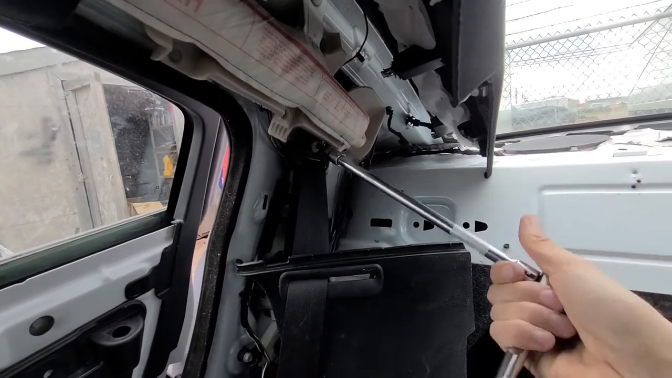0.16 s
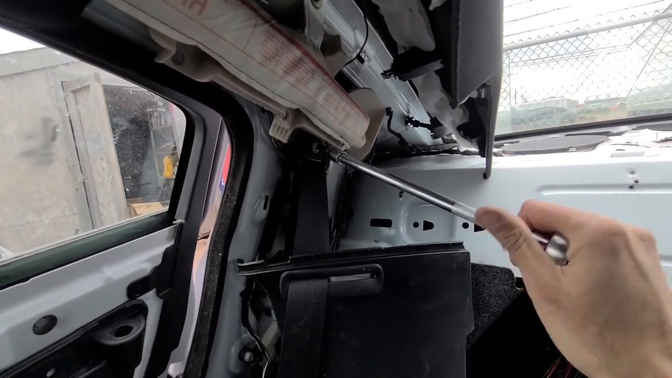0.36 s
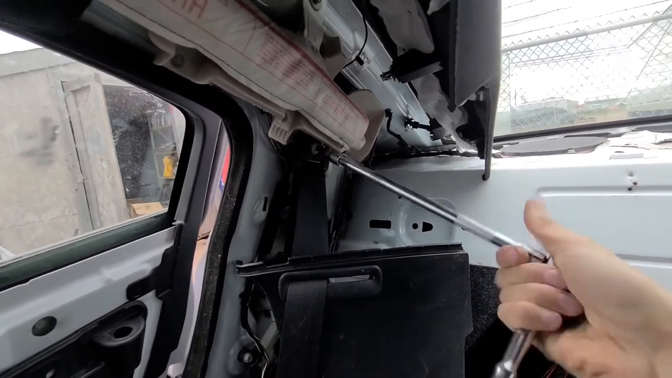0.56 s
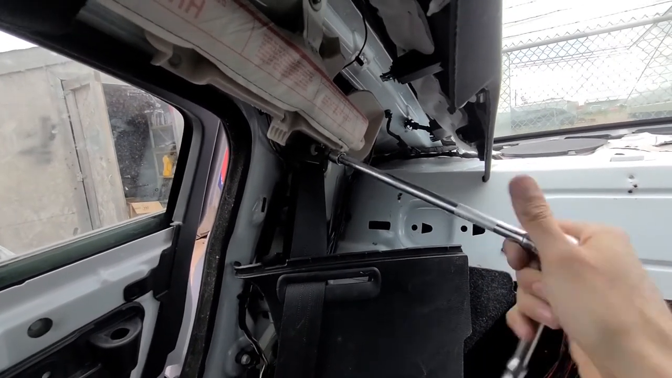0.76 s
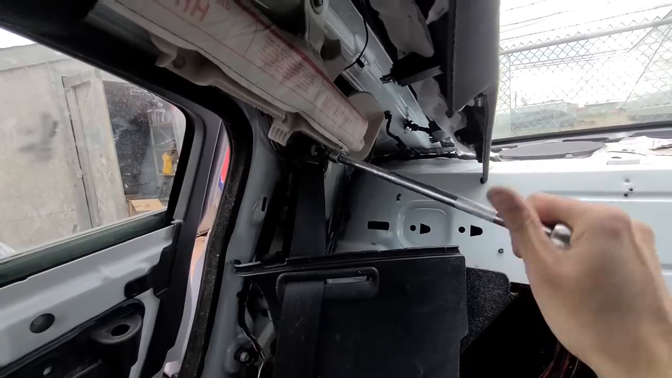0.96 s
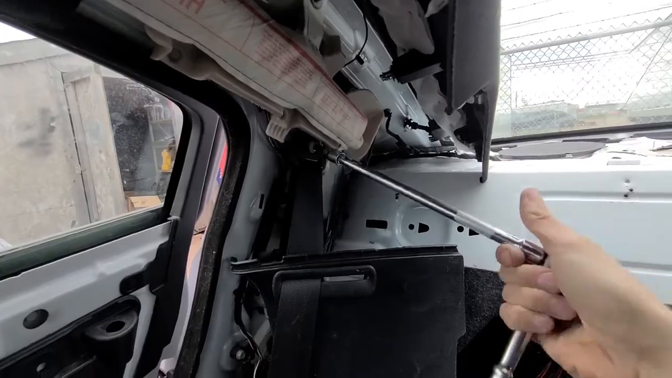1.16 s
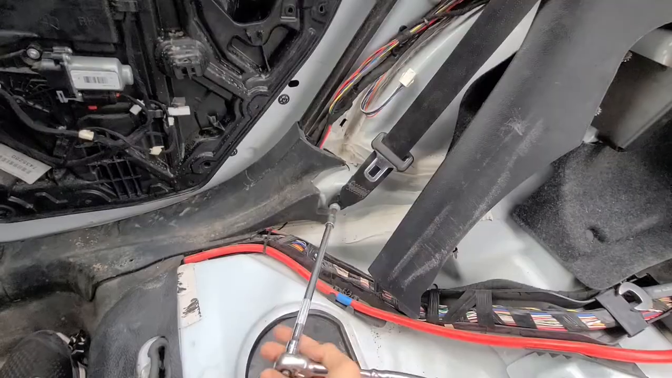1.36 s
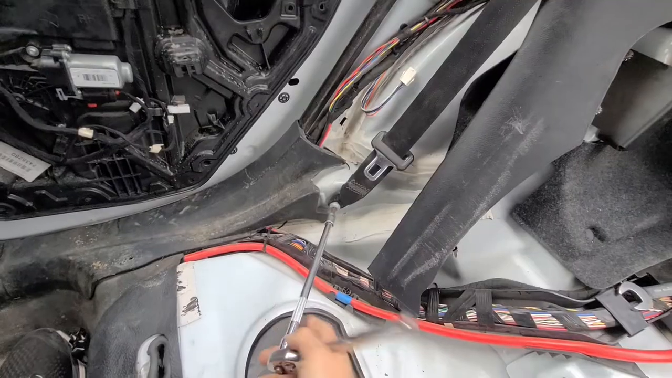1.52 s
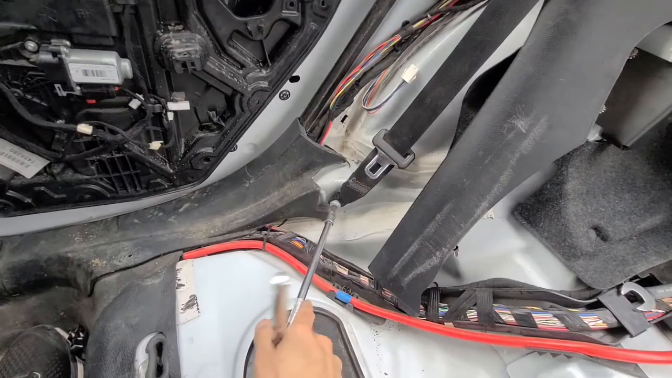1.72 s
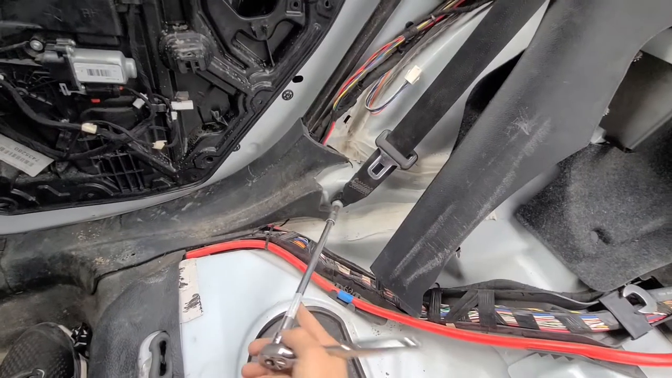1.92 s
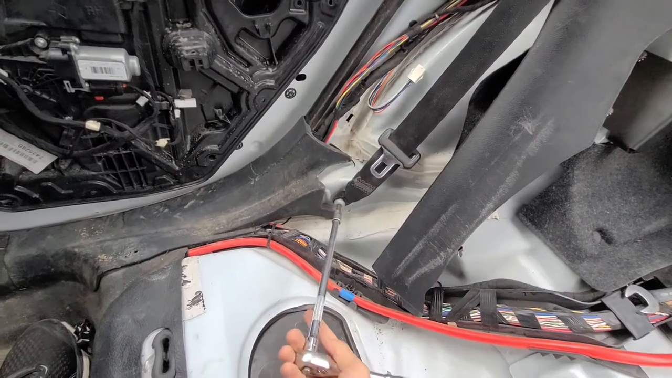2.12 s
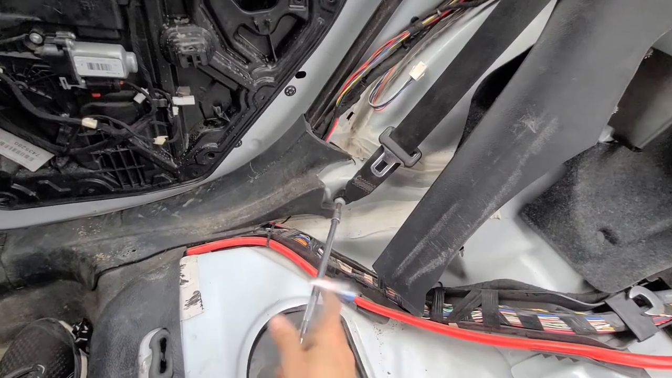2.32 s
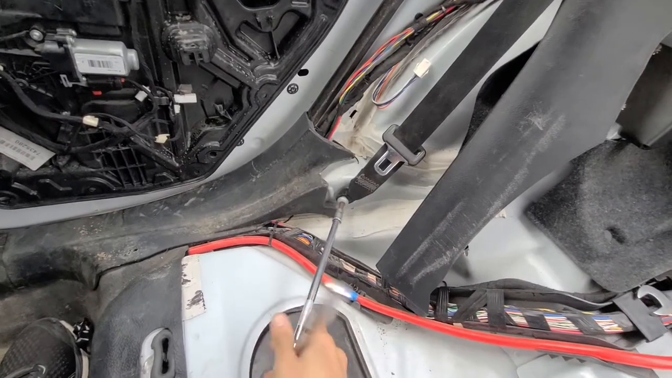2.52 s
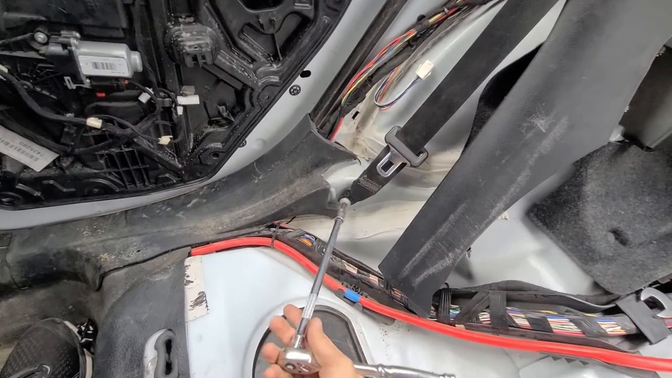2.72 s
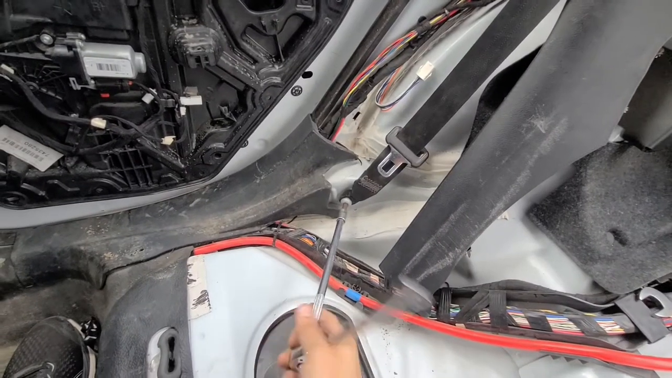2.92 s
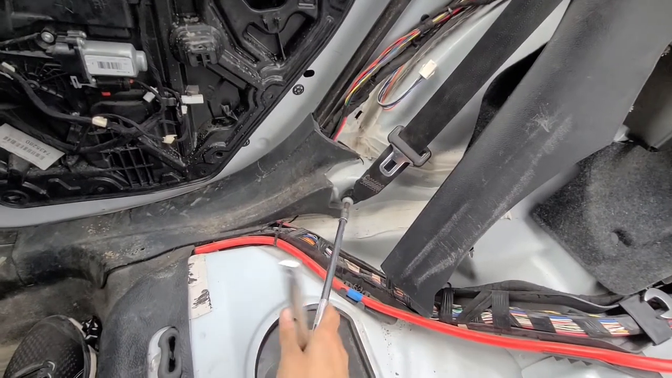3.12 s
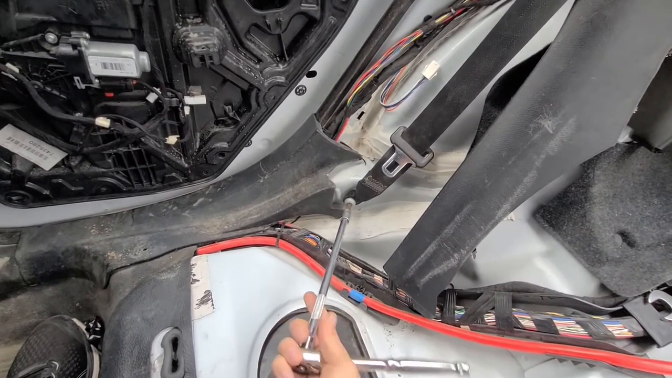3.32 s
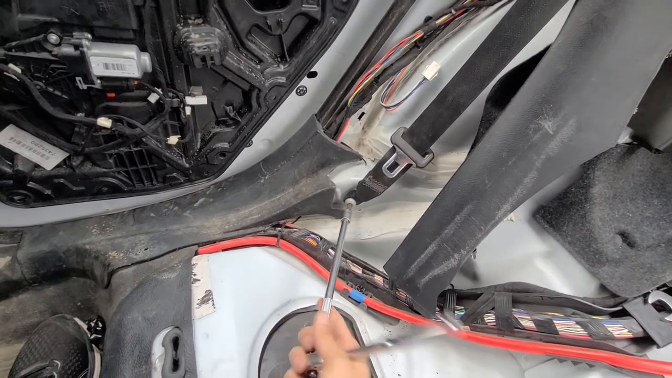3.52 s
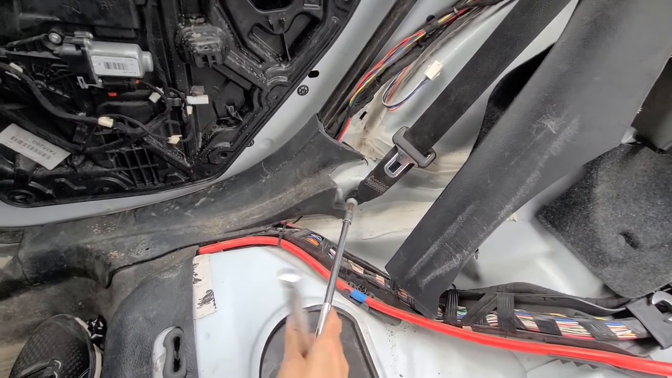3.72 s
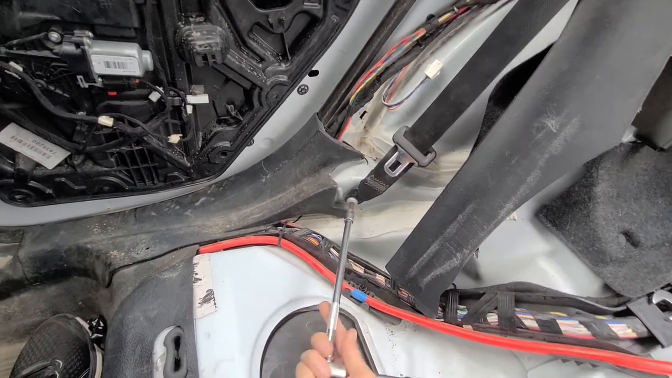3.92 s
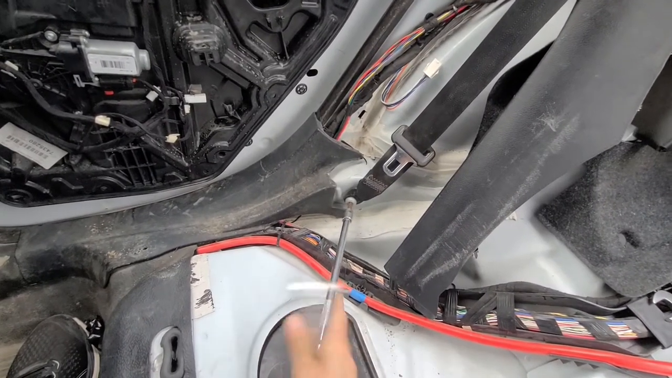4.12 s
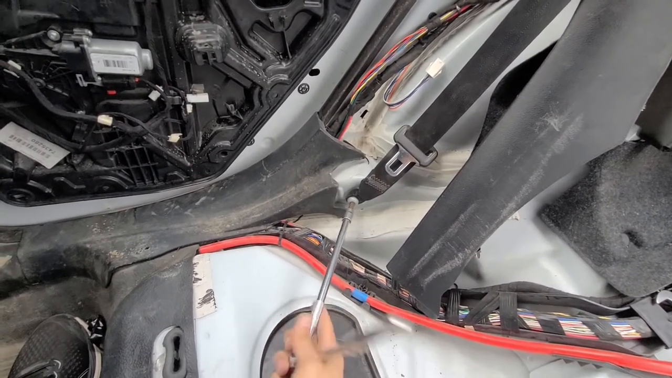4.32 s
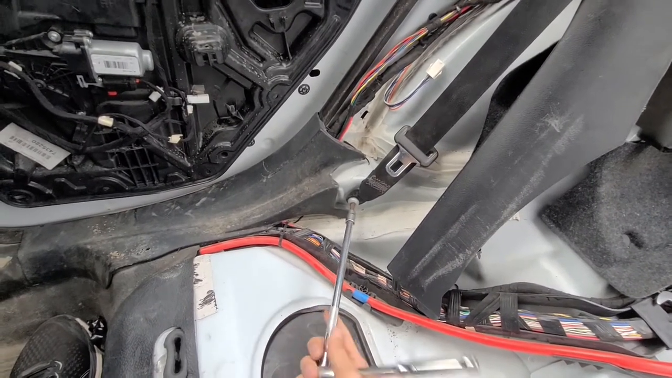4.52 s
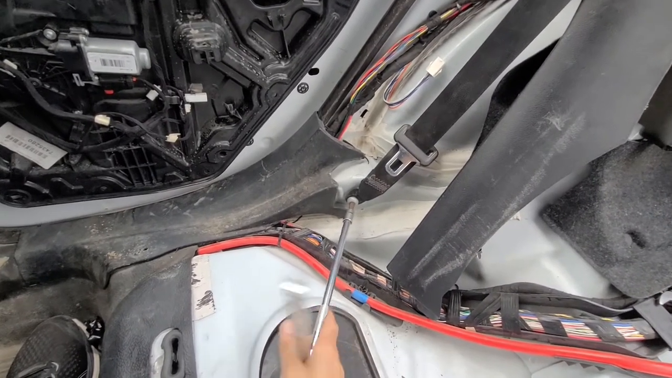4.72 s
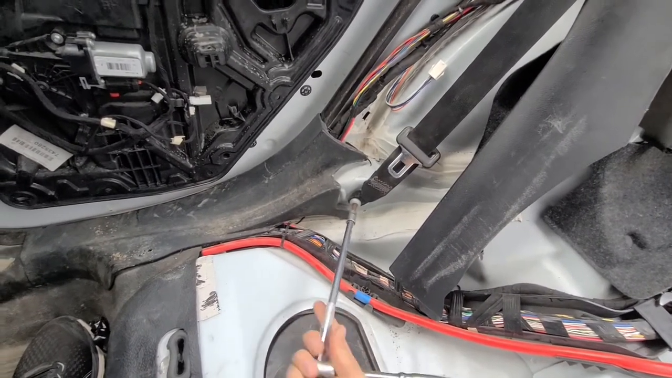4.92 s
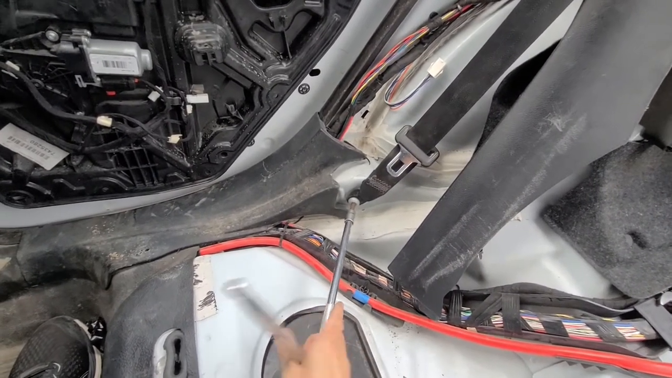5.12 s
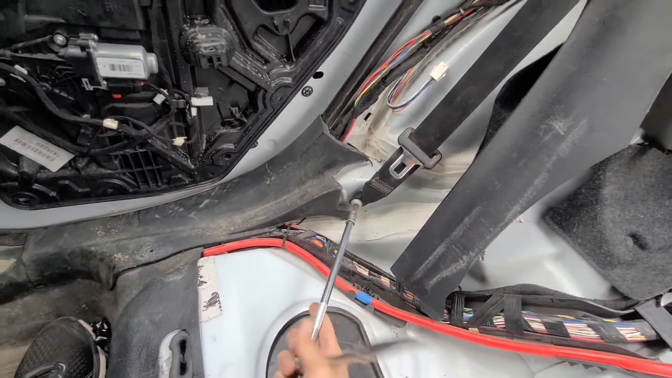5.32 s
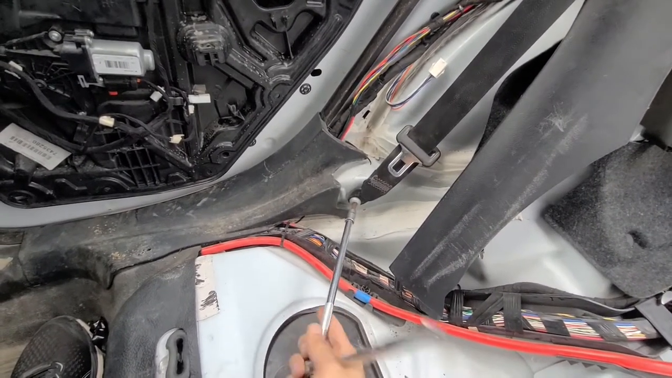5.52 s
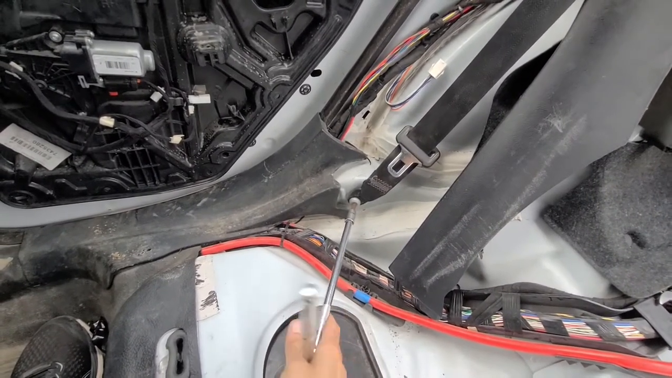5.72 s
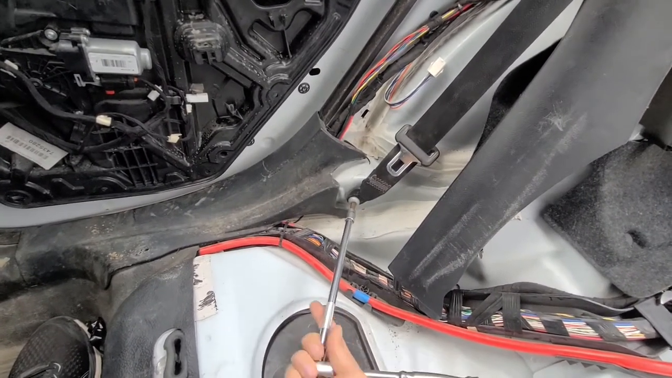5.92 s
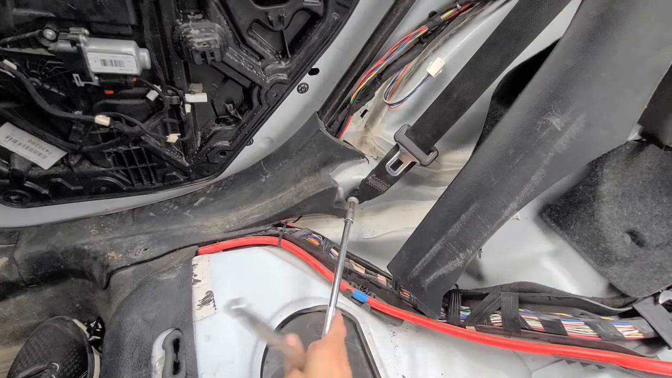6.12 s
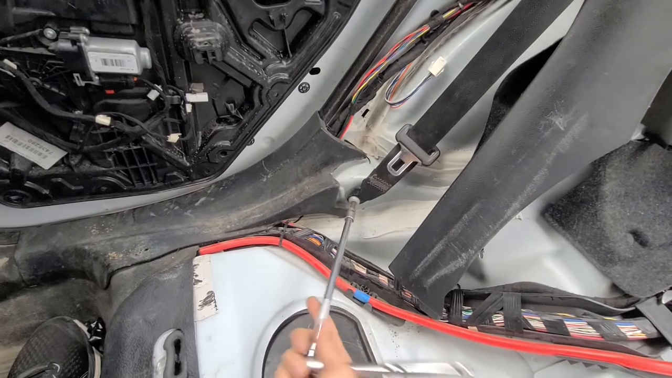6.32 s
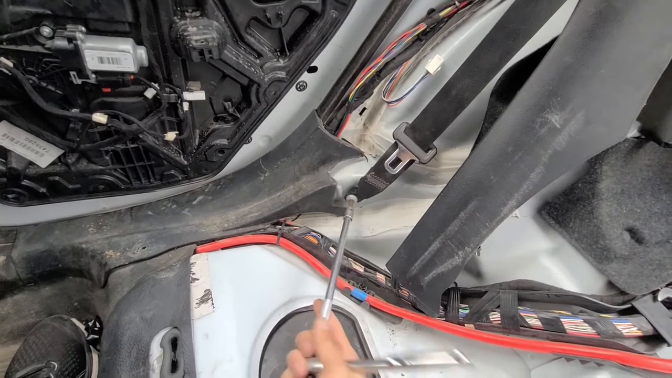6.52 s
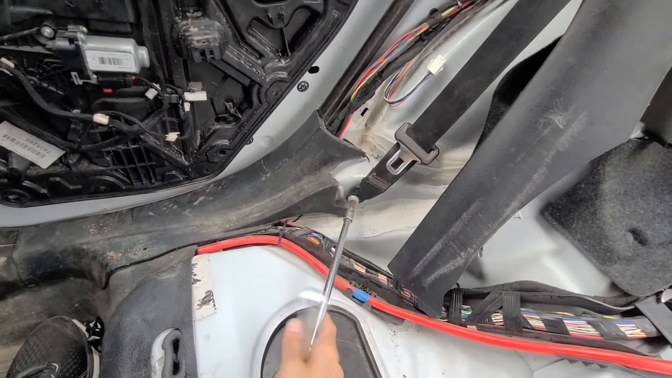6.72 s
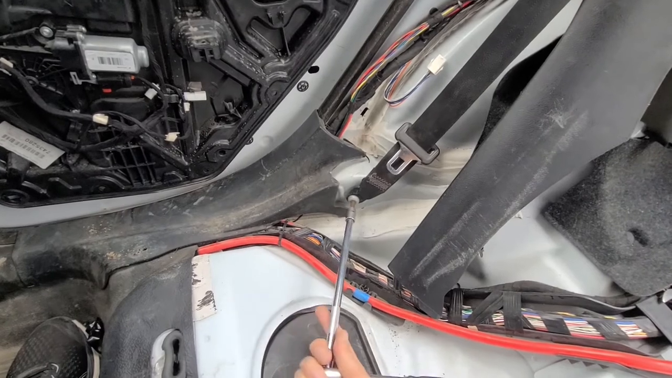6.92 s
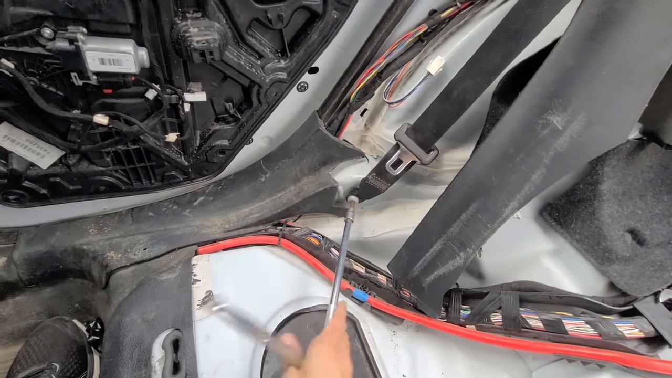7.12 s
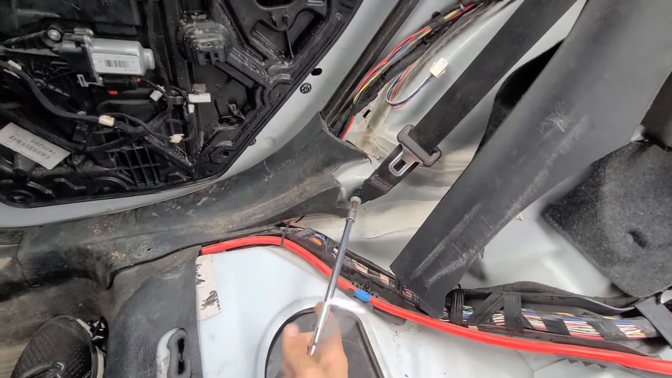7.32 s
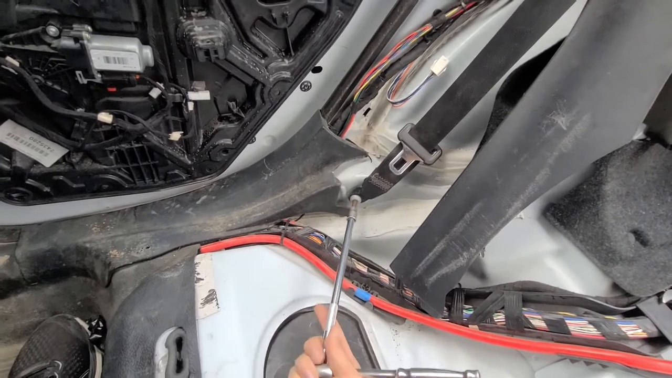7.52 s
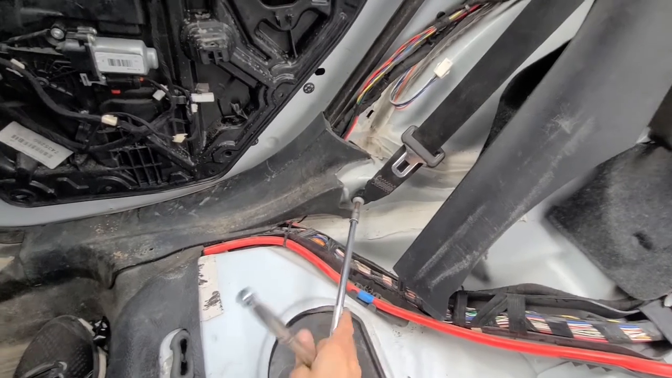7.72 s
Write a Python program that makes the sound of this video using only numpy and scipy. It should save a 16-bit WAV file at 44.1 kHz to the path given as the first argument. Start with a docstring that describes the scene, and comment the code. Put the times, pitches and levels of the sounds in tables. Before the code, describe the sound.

Inside a bare car cabin, close in stereo, a ratchet on a long extension gives two dense runs of steel clicks while a large panel rumbles, knocks and rasps. After a tiny dry tick and a very brief total silence, a cleaner series follows: a dozen short click runs about twice a second, with dull knocks and soft hand rubs between them over quiet outdoor air.

```python
"""Inside a stripped car cabin, a hand ratchet on a long extension tightens two bolts close to a stereo microphone.
On each back swing the pawl clicks over the gear teeth; slack in the joints knocks into the body panels.
Clicks and knocks are short bursts of noise that ring steel, panel and boom resonances, then a tail cut short.
Rumble, rasps, sliding and the quiet outdoor background are coloured noise with levels of their own.
The first bolt sits on a large booming panel; a short silence separates it from the second."""
import sys
import numpy as np
from scipy import signal
from scipy.fft import rfft, irfft
from scipy.io import wavfile
from scipy.ndimage import uniform_filter1d

SR = 44100
rng = np.random.default_rng(int(sys.argv[2]) if len(sys.argv) > 2 else 0)


def volts_from_decibels(level):
    """Turn decibel levels (scalar or array-like) into linear amplitude factors."""
    exponent = np.asarray(level, float) / 20
    return 10 ** exponent


def transcribe(signal):
    """Save signal, clipped to [-1, 1], as a 16-bit WAV file at the path in sys.argv[1]."""
    frames = np.atleast_2d(signal).T
    limited = np.clip(frames, -1, 1)
    pcm = np.round(limited * 32767).astype(np.int16)
    wavfile.write(sys.argv[1], SR, pcm)


N = 346626  # length in samples
SILENCE_FROM_S, SILENCE_TO_S = 1.2405, 1.2945
RING = 8192  # samples that one blow may ring
HZ = np.fft.rfftfreq(RING, 1 / SR)

# resonances of the steel tool, the panels and their boom: pitch_hz, width_hz (before the grip's damping),
# level_db (relative)
STEEL = [(1950, 610, -5.5), (2778, 134, 7.5), (3470, 118, 5), (4133, 180, 8), (6700, 600, -6),
         (6400, 59, -55), (7430, 1100, -9.5), (11000, 140, -45), (12400, 1040, -27), (14650, 2200, -20)]
PANEL = [(464.5, 18.3, 0.5), (525.6, 14.7, -2), (662.7, 15.4, 2), (837.6, 16, 5.5), (1084, 20, -7.5),
         (1216, 47, 2.5), (1445, 77, -7), (1873, 48.4, 1.5), (2130, 130, -8.5)]
BOOM = [(71, 28, -15.5), (90.6, 26.6, -2.5), (121, 49.5, -2), (200.7, 47, -3.5), (223.1, 6.9, 3),
        (278.7, 17, 3), (362.6, 41, -8.5)]
# the many blurred resonances between them: pitch_hz, level_db (relative)
STEEL_BED = [(500, -26.5), (1500, -9.5), (3000, -4.5), (6000, -2.5), (9000, -11), (12000, -2.5),
             (14000, -5.5), (16500, -29.5)]
PANEL_BED = [(200, -41.5), (500, -8), (1200, -19), (2500, -28.5), (5000, -29), (12000, -67.5)]
# how alike left and right are: pitch_hz, likeness (0 to 1)
SAME = [(60, 0.98), (160, 0.98), (290, 0.93), (640, 0.82), (1400, 0.29), (3000, 0.22), (15000, 0.15)]
# back swings: first_click_s, last_click_s, teeth (count), first_angle and last_angle (share of the half arc, -1 to 1)
SWINGS = [(.2341, .3736, 13, -.5, .75), (.7122, .8615, 13, -.6, .88), (1.471, 1.5678, 6, -.817, .809),
          (2.1977, 2.3344, 10, -.86, .949), (2.8513, 3.0028, 10, -.817, .953),
          (3.4775, 3.6049, 9, -.835, .955), (4.0056, 4.1377, 11, -.93, .823),
          (4.5131, 4.6403, 9, -.735, .984), (4.9947, 5.0895, 9, -.78, .79), (5.501, 5.5811, 7, -.493, .934),
          (5.9885, 6.0966, 9, -.635, .939), (6.4899, 6.5928, 9, -.832, .77),
          (6.9996, 7.1042, 10, -.719, .969), (7.6002, 7.6869, 7, 0, .956)]
# loudness of each swing: first_click_db, last_click_db, socket_drag_db
SNAPS = [(-24.5, -35, -40.5), (-19, -34, -35.5), (-17.5, -27.5, -36), (-18.5, -30.5, -30.5),
         (-16.5, -24.5, -37.5), (-18.5, -22, -43), (-19, -19.5, -36.5), (-15, -25.5, -35.5),
         (-16.5, -19.5, -37.5), (-15, -22.5, -46), (-17.5, -22, -37), (-14.5, -20.5, -38), (-15, -23, -35),
         (-15.5, -23, -45)]


def evened(x):
    """Scale a signal to an rms of 1."""
    return x / np.sqrt(np.mean(abs(x) ** 2) + 1e-20)


def read(points, hz):
    """Read a table between its points, along log frequency."""
    f, value = np.transpose(points)
    return np.interp(np.log(hz + 1), np.log(f + 1), value)


def pair(left, other, hz):
    """Spectra at two microphone ports: alike in the bass, unlike and leaning left in the treble."""
    # pitch_hz, left_over_right_db
    lean_points = [(60, 1.5), (400, 2), (700, 1), (1300, 3.5), (4400, 3), (8000, 0.5), (15000, 2)]
    same = np.clip(read(SAME, hz), 0, 1)
    lean = volts_from_decibels(read(lean_points, hz) / 2)
    right = same * left + np.sqrt(1 - same ** 2) * other
    return np.array([left * lean, right / lean])


def causal(points):
    """Response with the given spectrum that starts as promptly as possible (minimum phase)."""
    log_gain = np.log(volts_from_decibels(read(points, HZ)))
    circle = np.r_[log_gain, log_gain[-2:0:-1]]
    return np.exp(log_gain - 1j * signal.hilbert(circle).imag[:len(HZ)])


def modes(table):
    """One resonance response a row: a narrower one rings longer."""
    hz, width, db = np.transpose(table)[:, :, None]
    return volts_from_decibels(db) * 1j * HZ * width / (hz ** 2 - HZ ** 2 + 1j * HZ * width)


def noise(colour, level, patchy_db, size):
    """Coloured noise from random short-time spectra with louder and softer patches, then scaled by level."""
    frames, hz = 4 * N // size + 5, np.fft.rfftfreq(size, 1 / SR)
    a, b, c, d, patches = rng.standard_normal((5, frames, len(hz)))
    patches = uniform_filter1d(patches, size=6, axis=0)
    patches = evened(uniform_filter1d(patches, size=10, axis=1))
    spectra = pair(a + 1j * b, c + 1j * d, hz) * colour(hz) * volts_from_decibels(patchy_db * patches)
    sound = signal.istft(spectra.transpose(0, 2, 1), nperseg=size, noverlap=3 * size // 4)[1]
    return level * evened(sound[:, :N])


def curve(rows):
    """Gain over time from rows of time and dB, silent outside the table."""
    time_s, db = np.transpose(rows)
    return volts_from_decibels(np.interp(np.arange(N) / SR, time_s, db, -200, -200))


def swells(rows):
    """Sum of bell-shaped gains from rows of middle (s), half length (s) and dB."""
    t = np.arange(N) / SR
    return sum(volts_from_decibels(db) * np.exp(-((t - s) / half) ** 2) for s, half, db in rows)


def cabins(count, wet_db):
    """Direct sound, a little later on the left, and a short dense tail, in a few random variants."""
    # early fall of the tail: pitch_hz, time_to_lose_60_db (s)
    cabin_fall = [(100, .24), (300, .15), (1000, .12), (2800, .1), (8000, .1), (16000, .09)]
    # tails are cut short as if by a noise gate: pitch_hz, time_to_lose_a_further_30_db (s)
    gate_fall = [(100, .2), (1000, .075), (2500, .046), (16000, .04)]
    taps = np.zeros((count, 2, RING))
    at = np.arange(40, RING - 40, 20) + rng.integers(0, 20, (count, 2, (RING - 61) // 20))
    np.put_along_axis(taps, at, rng.choice([-1., 1.], at.shape), 2)
    hz, t, z = signal.stft(taps, SR, nperseg=128)
    fall_db = 60 * t / read(cabin_fall, hz)[:, None]
    fall_db = fall_db + 30 * (t / read(gate_fall, hz)[:, None]) ** 3
    room = signal.istft(z * volts_from_decibels(-fall_db), SR, nperseg=128)[1][..., :RING]
    room *= volts_from_decibels(wet_db) / np.linalg.norm(room, axis=2, keepdims=True)
    # direct sound; the left delay in samples differs from variant to variant
    room[:, 1, 0] += 1
    room[np.arange(count), 0, 2 + 2 * np.arange(count)] += 1
    z = rfft(room)
    return pair(z[:, 0], z[:, 1], HZ).transpose(1, 0, 2)


def blows(times, contact_ms, rise, wet_db, bright_db, bodies):
    """Each blow is a brief chatter of contacts that rings every body unevenly, then the cabin.

    rise: time constant of the onset as a share of the contact; bright_db: treble tilt per octave.
    bodies: (modes, bed, random shift of the modes as a share, ms over which the level holds, dB of each blow).
    """
    # resonances of the panel under the first bolt: pitch_hz, width_hz (before the grip's damping), level_db (relative)
    first_panel = [(458, 37, 12), (537, 14, 9.5), (735, 90, 2), (1126, 22, 5), (1448, 30, -1),
                   (3420, 130, -7)]
    grip_damping = 1.48  # the hand and the seated socket widen every mode
    grit_db, grit_ms = 4.5, 0.7  # a contact is a lumpy string of tiny impacts; full grit from 12 ms up
    rooms = cabins(count=5, wet_db=wet_db)  # used in turn by successive blows
    mix, t = np.zeros((2, N + RING)), np.arange(2048) / SR * 1000  # t in ms
    octaves = np.log2(np.clip(HZ, 2000, 16000) / 5000)
    alike = np.clip(read(SAME, HZ), .7, 1)  # the tool radiates a little differently towards each port
    for k, (s, ms) in enumerate(zip(times, np.clip(contact_ms, .3, 30))):
        shape = (1 - np.exp(-t / (rise * ms))) * np.exp(-(t / ms) ** 2)
        lumps = evened(uniform_filter1d(rng.standard_normal(len(t)), int(grit_ms * SR / 1000)))
        shape *= volts_from_decibels(grit_db * np.clip(ms / 12, 0, 1) * lumps)
        chatter = rfft(shape * rng.standard_normal((2, len(t))), RING)
        chatter[1] = alike * chatter[0] + np.sqrt(1 - alike ** 2) * chatter[1]
        heard = chatter * rooms[k % len(rooms)] * volts_from_decibels(bright_db[k] * octaves)
        for table, bed, shift, hold_ms, db in bodies:
            table = first_panel if table is PANEL and s < SILENCE_FROM_S else table
            chance = rng.standard_normal((2, 10))[:, :len(table)]
            struck = volts_from_decibels(2 * chance[0]) * (-1) ** np.arange(len(table))
            # each pitch shifts a little at random; the grip widens each mode
            change = np.c_[1 + shift * chance[1], np.ones((len(table), 2)) * [grip_damping, 1]]
            ring = modes(np.array(table) * change)
            sound = irfft(heard * (struck @ ring + bed))
            power = uniform_filter1d((sound ** 2).mean(0), int(hold_ms * SR / 1000))
            mix[:, round(s * SR):][:, :RING] += volts_from_decibels(db[k]) * sound / np.sqrt(power.max())
    return mix[:, :N]


def air():
    """Quiet outdoor background reaching into the cabin: steady noise, with less treble at the first bolt."""
    # colour of the background: pitch_hz, level_db (relative)
    air_colour = [(15, -22), (25, -66), (80, 19), (285, -4.5), (516, -1), (818, 1), (962, -27.5),
                  (1260, 5.5), (1610, -51), (1890, -13), (2480, -29.5), (3520, -12.5), (9070, -30.5),
                  (11900, -20.5), (16000, -26)]
    wash = noise(lambda hz: volts_from_decibels(read(air_colour, hz)), volts_from_decibels(-56), 0.5, size=2048)
    duller = signal.lfilter([.15], [1, -.85], wash)
    first_air = duller + volts_from_decibels(-25) * (wash - duller)
    return np.where(np.arange(N) < SILENCE_FROM_S * SR, first_air, wash)


def rasp_level():
    """Each rasp rises quickly, changes level while it holds, then dies away."""
    # loose parts rasp while the handle moves: start_s, hold_s, level_db, lost_over_hold_db
    rasps = [(0, .04, -36, 12.5), (.195, .03, -39, 7), (0.235, 0.11, -21, -0.5), (0.429, 0.087, -36.5, 1.5),
             (0.718, .14, -20.5, 4.5), (0.974, 0.091, -45.5, 5)]
    rise_s, fall_db_per_s = 0.0062, 709
    t = np.arange(N) / SR - np.array(rasps)[:, :1]
    hold, db, sag_db = np.transpose(rasps)[1:, :, None]
    fall_db = sag_db * np.clip(t / hold, 0, 1) + fall_db_per_s * np.maximum(t - hold, 0)
    return (np.clip(t / rise_s, 0, 1) * volts_from_decibels(db - fall_db)).sum(0)


def shake():
    """The first panel rumbles as noise shaped by its low modes, while loose parts rasp along."""
    # the large panel rumbles with the effort on the handle: time_s, level_db
    effort = [(0, -32.5), (.1, -37), (.18, -44.5), (.25, -31), (.37, -34.5), (.43, -34), (.55, -28.5),
              (.62, -40.5), (.7, -36.5), (.85, -48), (.92, -32.5), (1.05, -39), (1.11, -57.5),
              (1.24, -50.5)]
    # colour of the rasps: (pitch Hz, relative dB)
    loose = [(300, 14), (700, 9.5), (1500, 4.0), (2400, -5.5), (3100, 8.0), (4500, -27), (7000, -11.5),
             (12000, -12), (16000, -28)]
    boom = np.sqrt((abs(modes(BOOM)) ** 2).sum(0))
    rumble = noise(lambda hz: np.interp(hz, HZ, boom), curve(effort), 3, size=2048)
    rasp = noise(lambda hz: volts_from_decibels(read(loose, hz)), rasp_level(), 2, size=256)
    return rumble + rasp


def slack():
    """Knocks as slack is taken up, mostly duller and longer than the clicks, plus a few short steel clicks."""
    # knocks and a few clicks: bite_s, steel_db, panel_db, boom_db, contact_ms (blows() limits it to 0.3 to 30)
    knocks = [(0.013, -41, -19, -15, 5.7), (0.104, -39, -23, -20, 6), (.192, -35, -25, -25.5, 8),
              (0.213, -50, -22, -48, 32), (0.332, -21.5, -26, -39, 2), (.3732, -31.5, -44, -43.5, 2.3),
              (0.434, -31, -28, -37, 19), (0.451, -39.5, -25.5, -25, 8), (0.554, -36.5, -27, -28.5, 8.9),
              (.608, -36, -20.5, -22, 6.7), (0.64, -45, -44, -39, 2.6), (.669, -53, -44, -34.5, 3.5),
              (0.699, -51, -27.5, -53, 3.8), (0.912, -49, -31.5, -37, 3.9),
              (.935, -26.5, -21.5, -28.5, 13.4), (0.954, -54.5, -36.5, -44, 1),
              (1.007, -43, -25.5, -24, 3.5), (1.036, -58, -53, -35.5, 8.2),
              (1.372, -51.5, -33.5, -40.5, 11), (1.387, -37, -33, -43.5, 14), (1.685, -51, -47, -53, 5.6),
              (1.723, -37.5, -32, -46, 17), (1.739, -36, -32, -43.5, 8), (2.129, -49, -60, -42.5, 6.5),
              (2.404, -44.5, -36.5, -35.5, 14.5), (2.437, -36, -21.5, -23.5, 19),
              (2.467, -31, -35, -28, 7.5), (2.482, -37.5, -28, -34.5, 11), (2.778, -52.5, -26, -27.5, 5.8),
              (2.798, -38, -26.5, -54, 11.5), (3.05, -43, -26, -36.5, 20), (3.069, -24, -22.5, -27.5, 5.2),
              (3.245, -17.5, -17, -29.5, 3.25), (3.414, -43, -27.5, -27.5, 6.2),
              (3.428, -31.5, -29, -53, 9.7), (3.662, -51, -37, -45, 15), (3.684, -38.5, -26, -35, 9.9),
              (3.72, -40, -47, -59, 4.5), (3.76, -57, -41.5, -50, 11.4), (3.828, -51, -55, -65, 5),
              (3.927, -48.5, -32, -45, 15), (3.949, -40, -33.5, -41, 2.7), (4.178, -37, -46, -44, 3),
              (4.203, -30, -31.5, -38.5, 12), (4.213, -24.5, -19, -26.5, 9.5), (4.448, -52.5, -35, -37, 16),
              (4.417, -61.5, -45, -48, 5.4), (4.473, -32.5, -49.5, -65, 2.5), (4.676, -26.5, -25, -41, 18),
              (4.695, -27, -19.5, -25, 8), (4.85, -46.5, -55, -68, 7.3), (4.892, -63, -47, -43, 11),
              (4.93, -53, -31.5, -35.5, 6.9), (4.953, -31, -40, -51, 4.9), (5.1264, -19.5, -55, -46, 3.2),
              (5.158, -24, -16, -28.5, 14.3), (5.322, -49, -53.5, -68, 4.2),
              (5.451, -49.5, -30, -41.5, 6.4), (5.469, -29.5, -31, -51, 7), (5.637, -53, -33, -43, 40),
              (5.667, -37, -31, -39, 17), (5.788, -47, -42.5, -50, 16.6), (5.922, -37, -23, -29, 5.9),
              (5.957, -30, -36, -39, 8), (6.136, -39.5, -40, -38, 6.9), (6.151, -25, -32.5, -40, 4),
              (6.161, -25, -19.5, -40, 13), (6.173, -21.5, -17.5, -31.5, 6.2),
              (6.437, -31.5, -31, -36, 3.3), (6.451, -26.5, -29.5, -44, 6), (6.644, -44, -26, -45, 22),
              (6.678, -35.5, -31, -34, 11), (6.694, -30.5, -21.5, -30, 6.2), (6.758, -55, -54, -52, 3.9),
              (6.804, -50, -33.5, -44.5, 7.8), (6.957, -40, -26, -33.5, 11), (6.975, -25.5, -24, -33, 5.2),
              (7.144, -28.5, -30.5, -46, 22), (7.171, -17.5, -11, -24, 7.5), (7.292, -49, -49, -52.5, 7.3),
              (7.319, -41.5, -43.5, -58, 7.3), (7.563, -37, -30.5, -24, 16), (7.577, -24.5, -24, -34, 2.15),
              (7.74, -55, -29, -34.5, 27), (7.774, -39.5, -35.5, -39, 42), (7.804, -24.5, -20, -37, 5)]
    s, steel_db, panel_db, boom_db, ms = np.transpose(knocks)
    bodies = [(STEEL, causal(STEEL_BED) * volts_from_decibels(1.5), .04, 1.5, steel_db),
              (PANEL, causal(PANEL_BED) * volts_from_decibels(6.5), .02, 4.5, panel_db),
              (BOOM, 0, .03, 11, boom_db)]
    # each begins a quarter of its contact time, 2.5 ms at most, before it bites
    start_s = np.maximum(s - 0.25 * np.minimum(ms, 10) / 1000, 0)
    return blows(start_s, ms, rise=0.5, wet_db=-0.065, bright_db=np.full(len(s), -1.5), bodies=bodies)


def handling():
    """Skin and steel sliding, swelling in rubs and through each swing, and a low wobble of the grip."""
    # hand and tool sliding at the second bolt: time_s, level_db
    sliding = [(1.3, -63.5), (2.27, -59), (6.52, -54), (6.63, -50), (6.82, -63.5), (7.2, -47.5),
               (7.44, -66.5), (7.86, -47.5)]
    # colour of the sliding: pitch_hz, level_db (relative)
    rustle_colour = [(200, -40.5), (700, 16), (1200, 7.5), (2000, 3.5), (4000, -4), (9000, -11),
                     (16000, -25.5)]
    # soft rubs as the grip shifts: middle_s, half_length_s, level_db
    rubs = [(2.122, 0.01, -53.5), (3.998, 0.0052, -41), (4.19, .015, -42.5), (2.536, 0.012, -49),
            (5.152, 0.028, -37.5), (5.662, 0.014, -40.5), (6.286, 0.022, -39), (6.782, 0.028, -40),
            (7.327, 0.04, -49.5), (7.551, 0.0087, -42.5)]
    # the hand's weight landing on the handle: middle_s, half_length_s, level_db
    thuds = [(2.47, 0.031, -32), (7.2, 0.025, -42), (7.58, 0.02, -38)]
    # colour of the wobble: (pitch Hz, relative dB)
    low = [(25, -33), (60, 26.0), (90, 16.5), (150, 1.5), (300, 8.5), (600, -35.5), (2000, -67.5)]
    level = curve(sliding)
    # the socket drags through each swing; half length is a share of the swing
    drags = [((first + last) / 2, 0.44 * (last - first), drag_db)
             for (first, last, *_), (_, _, drag_db) in zip(SWINGS, SNAPS)]
    rustle_level = level + swells([*rubs, *drags])
    rustle = noise(lambda hz: volts_from_decibels(read(rustle_colour, hz)), rustle_level, 3.1, size=256)
    # the wobble follows the sliding less than fully: 0.76 dB for each dB
    wobble_level = volts_from_decibels(-9) * level ** 0.76 + swells(thuds)
    return rustle + noise(lambda hz: volts_from_decibels(read(low, hz)), wobble_level, 3.5, size=2048)


def teeth():
    """Time, level and treble tilt of every click: the handle angle follows a sine, over equal tooth steps."""
    ease = 1.93  # the level change comes late in the swing
    turn_tilt_db = 0.43  # per octave: clicks dull as the head turns away through a swing
    times, levels, tilts = [], [], []
    for (first, last, count, first_angle, last_angle), (first_db, last_db, _) in zip(SWINGS, SNAPS):
        along = np.linspace(0, 1, count)
        phase = np.arcsin(first_angle + (last_angle - first_angle) * along)
        times.append(first + (last - first) * (phase - phase[0]) / (phase[-1] - phase[0]))
        levels.append(first_db + (last_db - first_db) * along ** ease)
        tilts.append(turn_tilt_db * np.cos(np.pi * along))
    return np.concatenate(times), np.concatenate(levels), np.concatenate(tilts)


def pawl():
    """Sharp, even steel clicks; a little passes down the extension into the panel, more when teeth pass fast."""
    # passed on by a click, a row for each bolt: panel_db, boom_db (before the speed of the teeth alters them)
    passed = [(-27, -34.5), (-31.5, -47.5)]
    # clicks start bright at the second bolt and dull as it seats
    extra_bright_db, settled_bright_db, seating_s = 4.8, 0.22, 1.63  # dB per octave, time constant
    s, steel_db, tilt_db = teeth()
    steel_db = steel_db + 0.1 * rng.standard_normal(len(s))  # teeth differ a little
    second = s > SILENCE_TO_S
    panel_db, boom_db = np.array(passed)[second.astype(int)].T
    seating = np.exp(-abs(s - SWINGS[2][0]) / seating_s)  # counted from the second bolt's first click
    bright_db = settled_bright_db + tilt_db + second * extra_bright_db * seating
    gap_s = np.clip(np.diff(s, prepend=0), .008, .03)
    speed_db = 20 * np.log10(.012 / gap_s)
    bodies = [(STEEL, causal(STEEL_BED), .035, 1.5, steel_db),
              (PANEL, causal(PANEL_BED), .02, 4.5, panel_db + 0.5 * speed_db),
              (BOOM, 0, .03, 11, boom_db + 0.37 * speed_db)]
    # each contact begins 1 ms ahead of its click time
    return blows(s - .001, np.full(len(s), 3.2), rise=.35, wet_db=-3, bright_db=bright_db, bodies=bodies)


def tick():
    """A faint dry tick before the silence: about a millisecond of broad noise with no ring."""
    t = np.arange(N) / SR - 1.2305
    smooth = uniform_filter1d(rng.standard_normal((2, N)), size=6, axis=1)
    return volts_from_decibels(-29) * np.exp(-(t / .0008) ** 2) * smooth


def jiggle():
    """Faint ticks of the loose socket, scattered at random through the second bolt."""
    rate_per_s, contact_ms = 4, 3
    span = N / SR - SILENCE_TO_S
    at, size, lean = rng.random((int(rate_per_s * span), 3)).T
    s = SILENCE_TO_S + span * at
    steel_db = -59 - 3 * np.log(size + 0.0067)  # a few ticks stand out
    panel_db = steel_db + 3 * (4 * lean - 2)  # up to 6 dB over or under the steel
    bodies = [(STEEL, causal(STEEL_BED), .04, 1.5, steel_db),
              (PANEL, causal(PANEL_BED), .02, 4.5, panel_db)]
    return blows(s, np.full(len(s), contact_ms), rise=.3, wet_db=-1.4, bright_db=np.zeros(len(s)), bodies=bodies)


def scene():
    """All sounds together."""
    return air() + shake() + slack() + handling() + pawl() + tick() + jiggle()


def band_limit(x):
    """A steep low-pass at the top of the band."""
    return signal.sosfilt(signal.butter(12, 16500, fs=SR, output="sos"), x)


def record(dry):
    """The microphone rolls off the deep bass; the sound drops out briefly between the two bolts."""
    t = np.arange(N) / SR
    low_cut = signal.butter(2, 44.3, "high", fs=SR, output="sos")  # corner in Hz
    heard = signal.sosfilt(low_cut, dry)
    sounding = (t < SILENCE_FROM_S) | (t > SILENCE_TO_S)
    return band_limit(heard * sounding)


dry = scene()
out = record(dry)
transcribe(out)
```